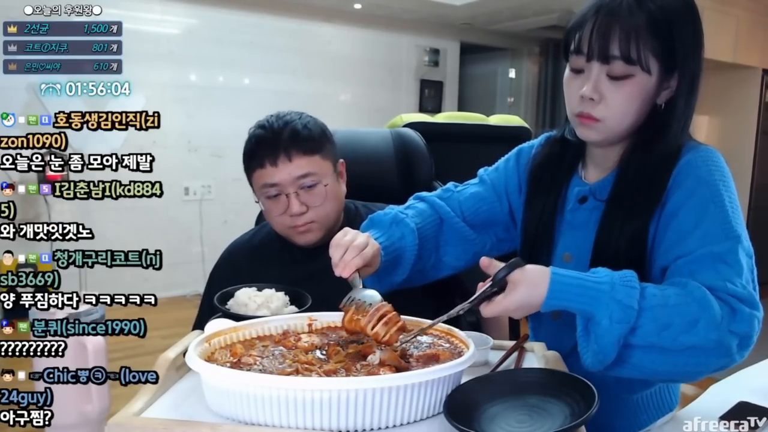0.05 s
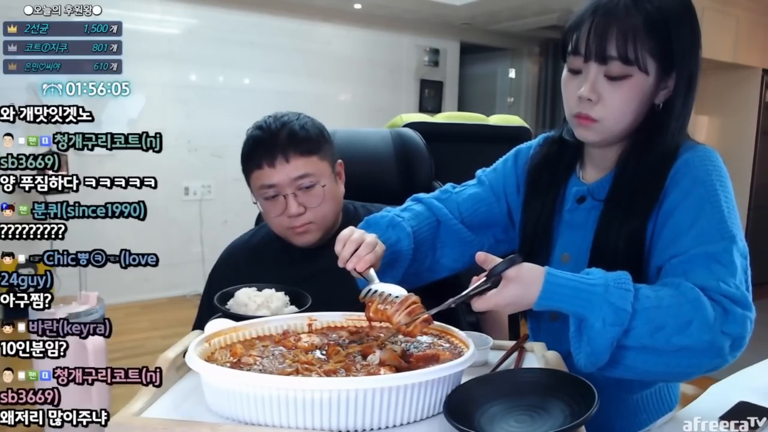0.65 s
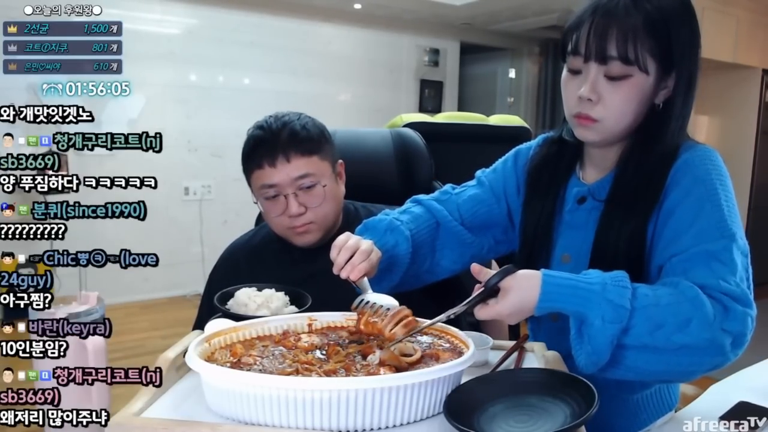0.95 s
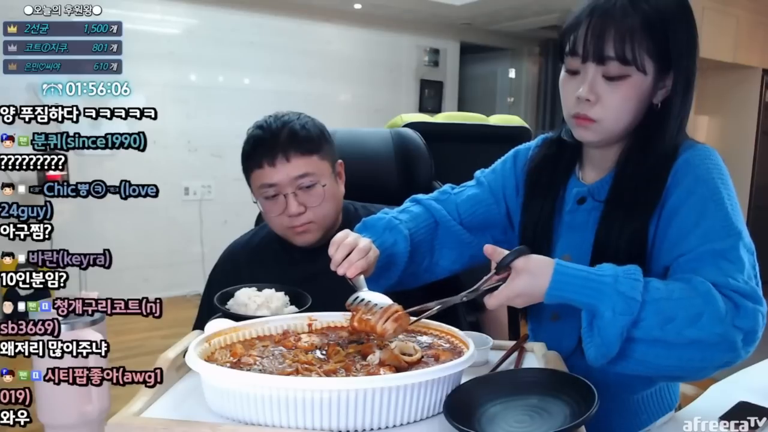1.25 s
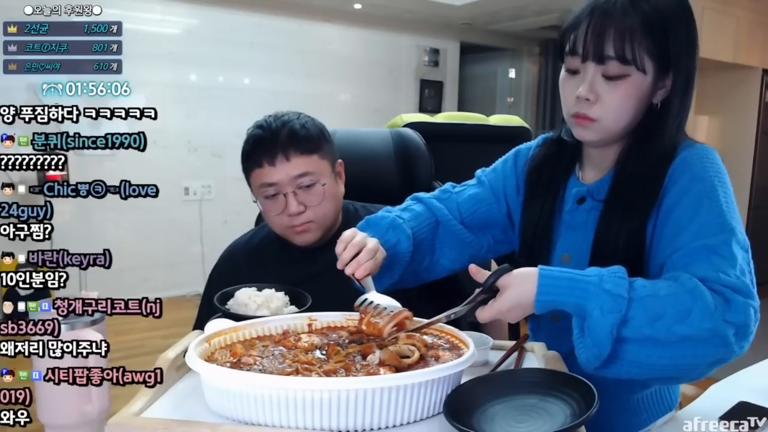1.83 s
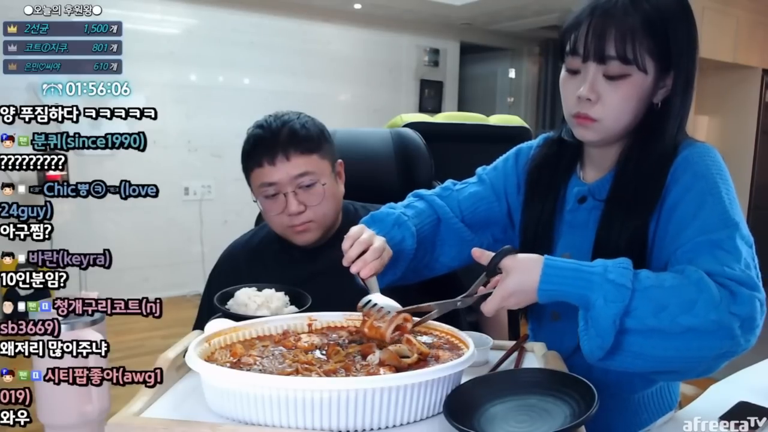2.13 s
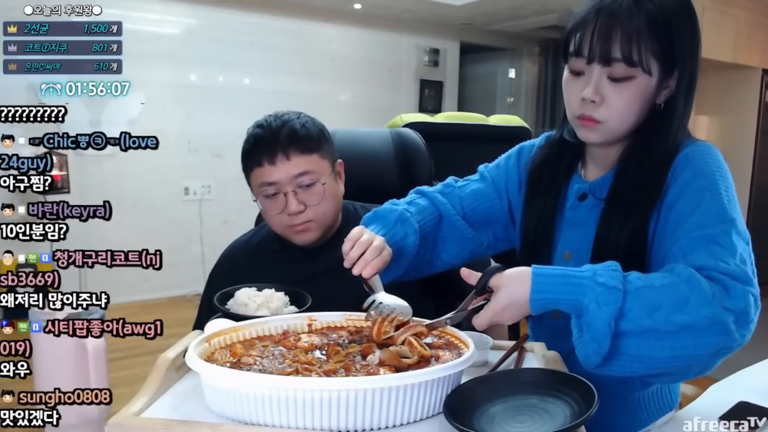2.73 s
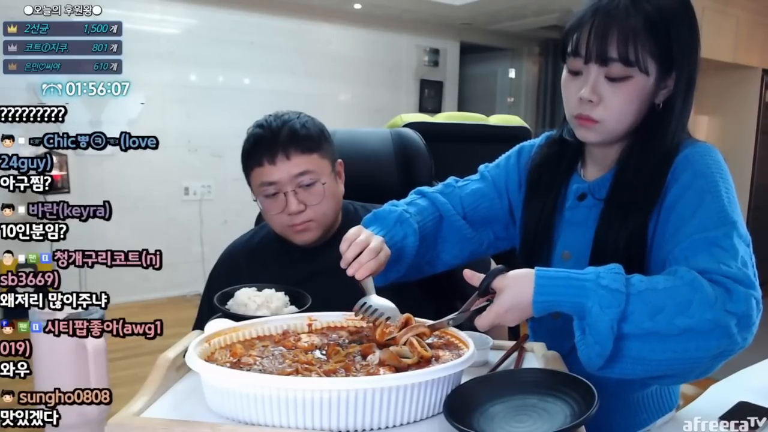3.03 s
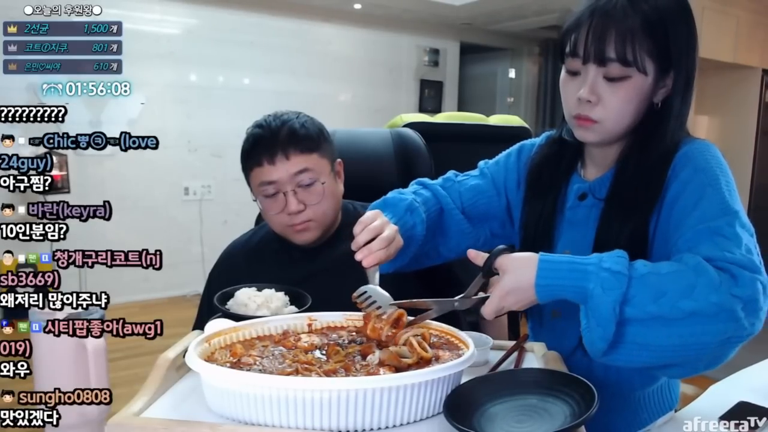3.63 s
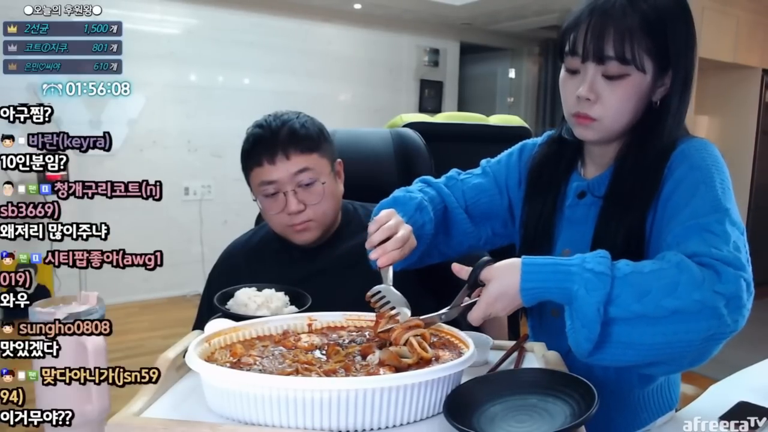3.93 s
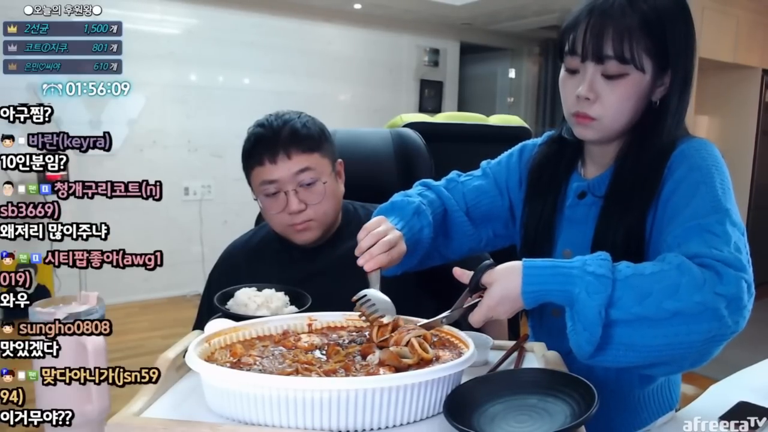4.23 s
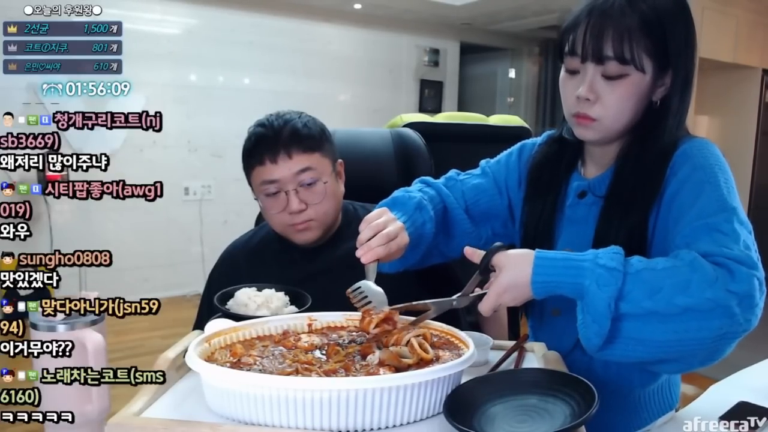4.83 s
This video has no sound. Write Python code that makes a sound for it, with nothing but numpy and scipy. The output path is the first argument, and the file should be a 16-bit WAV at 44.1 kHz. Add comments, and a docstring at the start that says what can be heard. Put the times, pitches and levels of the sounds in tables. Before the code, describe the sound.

Close, crisp snips of scissors cutting saucy food, with small metallic clinks and squeaks, in a quietly humming room.

```python
"""Kitchen scissors cut food held with a fork over a serving dish, close by in a small room that hums.
First come three snips: the steel blades hiss along each other, snap shut and slide open again.
Next the blades jerk under pressure with a clink and a short squeak, then rub lightly.
A fourth snip, a second jerk and two more snips follow; the last snaps loudest, and the blades reopen.
All along, sauce and cutlery tick faintly."""
import sys
import numpy as np
from scipy import signal
from scipy.fft import rfft, irfft, next_fast_len
from scipy.io import wavfile
from scipy.ndimage import map_coordinates

SR = 44100
rng = np.random.default_rng(int(sys.argv[2]) if len(sys.argv) > 2 else 0)


def wav_out(sig):
    """Save sig, one row per channel (or a flat mono array), as 16-bit PCM at SR to the path in sys.argv[1]."""
    wavfile.write(sys.argv[1], SR, np.round(np.clip(np.atleast_2d(sig).T, -1, 1) * 32767).astype(np.int16))


N = 223887

# Each closing of the scissors:
# shut_s, squeeze_s, bite_db, sweep_db, crack_db, clack_db, knock_db, bright_hz, stereo_width (0-1)
SNIPS = [(0.0196, .08, -43, -36.5, -31, -36, -51.5, 12000, 0.07),
         (1.0045, 0.084, -43, -31, -21.5, -29, -46, 11600, 0.66),
         (1.890, .058, -42, -31.5, -45, -54, -61, 13000, 0.05),
         (3.3592, 0.046, -42, -38, -20.5, -35.5, -29, 12400, 0.01),
         (4.2484, 0.039, -52, -44, -42, -47.5, -33, 8700, 0.03),
         (4.6555, 0.085, -40, -32, -15.5, -40, -24, 11000, 0.9)]
# Tone colour of the sharp crack: pitch_hz, level_db
CRACK_COLOUR = [(200, -32), (700, -21.5), (1500, -11.5), (2100, -19), (3000, -14.5), (4000, -10),
                (4900, -8), (6500, -0.5), (7500, -1.5), (8700, 5), (10500, -7), (12500, -5.5),
                (15500, -15.5)]
# Tone colour of the pivot's hollow clack: pitch_hz, level_db
CLACK_COLOUR = [(1500, -19.5), (2800, -10.5), (3350, -1.5), (3750, 1.5), (4200, -3), (4800, -10),
                (6200, -7.5), (8000, -32.5)]
# Notes of the handles as they meet: pitch_hz, level_db, fade_s (time to fall 60 dB)
HANDLE_NOTES = [(486.5, -13, 0.039), (843, -6, 0.049), (952, -2, 0.029), (1045, -6, 0.018),
                (1314, -3.5, 0.021), (1665, -10.5, 0.0234)]

def snaps():
    """The blades rush through the last of the food: a crack, a pivot clack and a knock of the handles."""
    out, lead_s = np.zeros((2, N)), 0.015
    t = np.arange(SR // 5) / SR - lead_s  # zero when the blades shut
    after = np.maximum(t, 0)
    rush = gain(-19.5 + 20 * np.minimum(t, 0) / 0.015)
    release = fade(after, 0.004) + gain(-9) * fade(after, 0.035)
    force = np.where(t < 0, rush, release)
    onset = 1 - np.exp(-after / 0.00046)
    for shut_s, *_, crack_db, clack_db, knock_db, bright_hz, width in SNIPS:
        crack = hit(coloured(force * slips(len(t), rough=0.17), CRACK_COLOUR), crack_db)
        clack = hit(coloured(force * slips(len(t), rough=0.44), CLACK_COLOUR), clack_db)
        knock = hit(onset * ring(HANDLE_NOTES, after, scatter_db=2), knock_db)
        # some snaps sound duller, others brighter
        snap = muffled(crack + clack + knock, bright_hz, steepness=10)
        snap = widened(snap, width)
        add(out, shut_s - lead_s, snap)
        add(out, shut_s - lead_s + 0.009, gain(-21.5) * snap)  # bounce off a near surface
    return out

# The blades slide open again: peak_s, level_db
OPENINGS = [(0.182, -38), (1.188, -38), (2.046, -39), (3.541, -36), (4.826, -37.5)]
# Loose blades rub lightly between cuts: peak_s, level_db, rise_s, fall_s (both over the top 20 dB)
LIGHT_RUBS = [(2.765, -59.5, 0.2, 0.2), (2.912, -57.5, 0.05, 0.18)]

def rubbing_effort():
    """How hard the edges rub: each snip bites, squeezes and sweeps shut; opening blades rub too."""
    t = np.arange(N) / SR
    def stroke(peak_s, level_db, rise_s, fall_s):
        drop = np.where(t < peak_s, ((peak_s - t) / rise_s) ** 2, (t - peak_s) / fall_s)
        return gain(level_db - 20 * drop)
    strokes = [stroke(*rub) for rub in LIGHT_RUBS]
    strokes += [stroke(*opening, rise_s=0.016, fall_s=0.049) for opening in OPENINGS]
    for shut_s, squeeze_s, bite_db, sweep_db, *_ in SNIPS:
        bite_s = shut_s - squeeze_s
        bite = stroke(bite_s, bite_db, rise_s=0.034, fall_s=0.031)
        squeeze = gain(bite_db - 9) * ((t > bite_s) & (t < shut_s))
        sweep = stroke(shut_s, sweep_db, rise_s=0.016, fall_s=0.015)
        strokes += [bite, squeeze, sweep]
    return np.linalg.norm(strokes, axis=0)

# Tone colour of edge sliding on edge: pitch_hz, level_db
HISS_COLOUR = [(500, -28.5), (1800, -17.5), (3200, -17), (4400, -9.5), (5000, -15), (6500, -9),
               (8000, -1.5), (9000, 1), (10300, -1), (11600, -11), (12500, -8), (14400, -12), (15300, -8.5)]
# Notes of the bare steel blades: pitch_hz, level_db, fade_s
STEEL_NOTES = [(1380, -19.5, 0.031), (2377, -9, 0.027), (3760, -15.5, 0.053), (4010, -17, 0.069),
               (4430, -14.5, 0.058), (5620, -9, 0.036), (6570, -4.5, 0.066), (6800, -4.5, 0.069),
               (7340, -7.5, 0.057), (7900, -19, 0.029), (8140, -6, 0.025), (8320, -3.5, 0.063),
               (9014, 0.5, 0.057), (9960, -7, 0.061), (12900, -11, .04), (12700, -20, .04),
               (13800, -7, 0.043)]

def blade_hiss():
    """The edges rub through wet food: a gritty hiss that swells and fades with each stroke."""
    effort = rubbing_effort()
    catches = gain(2.5 * wobble(200))  # the edges catch and let go
    rub = effort * unit_level(catches * slips(N, rough=0.31))
    steel = ring(STEEL_NOTES, np.arange(SR // 8) / SR, scatter_db=-6.5)
    blades = gain(-3) * coloured(rub, HISS_COLOUR) + gain(-14.5) * resonate(rub, steel)
    grit = gain(-6.5) * crackle(per_s=1300, centre_hz=9810, spread=0.37, life_s=0.00047)
    squelch = gain(-23) * crackle(per_s=600, centre_hz=2949, spread=0.483, life_s=0.00087)
    return blades + effort * (grit + squelch)

def crackle(per_s, centre_hz, spread, life_s, size=256):
    """Wet fibres part: tiny pings of random pitch and strength."""
    when, pitch, strength = rng.uniform(0.001, 0.999, (int(per_s * N / SR), 3)).T
    hz = np.clip(centre_hz * np.exp(spread * (2 * pitch - 1)), 500, SR / 2.2)[:, None]
    t = np.arange(size) / SR
    swell = t / life_s * np.exp(-t / life_s)
    pings = -np.log(strength)[:, None] * swell * np.sin(2 * np.pi * hz * t)
    places = (when * N).astype(int)[:, None] + np.arange(size)
    return unit_level(np.bincount(places.ravel(), pings.ravel(), N)[:N])

# Blades jerk under pressure; high and low are two squeaks, their levels relative to the drag:
# start_s, clink_db, drag_start_db, drag_end_db, length_s, high_hz, high_db, low_hz, low_db, stereo_width
JERKS = [(2.3915, -25, -30, -41, 0.0456, 9200, -6, 6340, -8.5, 0),
         (3.8985, -20.5, -34.5, -21, 0.035, 8110, 0.5, 7030, -7.5, 0.9)]
# Tone colour of steel breaking loose: pitch_hz, level_db
CLINK_COLOUR = [(500, -49), (1000, -26), (1400, -8.5), (1900, -26.5), (2500, -19.5), (3900, -6.5),
                (5000, -17), (6500, -0.5), (9000, 2), (10800, -8.5), (12800, -4.5), (14000, -5),
                (15500, -15)]
# Tone colour of steel dragging: pitch_hz, level_db
DRAG_COLOUR = [(400, -35), (1000, -29.5), (1400, -12), (1900, -21), (2500, -16), (4100, -12), (5000, -16),
               (6700, -3), (8500, 3), (10100, -2), (11200, -10), (13300, -4), (15500, -18)]

def jerks():
    """Steel breaks loose with a clink, then drags on; it sticks and slips, squeaking on two notes."""
    out, t = np.zeros((2, N)), np.arange(SR // 5) / SR
    def squeak(hz, db):
        level = gain(db + 2.9 * wobble(455, len(t)))
        pitch_hz = hz * (1 + 0.0108 * wobble(1000, len(t)))
        return level * np.sin(2 * np.pi * np.cumsum(pitch_hz) / SR)
    for start_s, clink_db, *drag_db, length_s, high_hz, high_db, low_hz, low_db, width in JERKS:
        release = fade(np.maximum(t - length_s, 0), 0.0335)
        pressure = gain(np.interp(t, [0, length_s], drag_db)) * release
        clink = hit(coloured(fade(t, 0.029) * slips(len(t), rough=0.21), CLINK_COLOUR), clink_db)
        rub = pressure * slips(len(t), rough=0.37)
        drag = gain(-5.5) * coloured(rub, DRAG_COLOUR)
        steel = ring(STEEL_NOTES, t, scatter_db=-1.5)
        ringing = gain(-8) * resonate(rub + gain(-12) * clink, steel)
        squeaks = pressure * (squeak(high_hz, high_db) + squeak(low_hz, low_db))
        add(out, start_s, clink + widened(drag + ringing + squeaks, width))
    return out

# An edge sings as the blades' crossing point slides to the tips:
# start_s, end_s, start_hz, end_hz, level_db
EDGE_NOTES = [(0.853, 0.988, 7450, 12300, -59), (2.68, 2.812, 9500, 10800, -66),
              (3.237, 3.343, 9600, 10900, -56.5), (4.541, 4.580, 4450, 4630, -52)]

def singing_edge():
    """The free end of the blade shortens, so its fuzzy note rises."""
    out = np.zeros(N)
    for start_s, end_s, start_hz, end_hz, level_db in EDGE_NOTES:
        size = round((end_s - start_s) * SR)
        phase = 2 * np.pi * np.cumsum(np.linspace(start_hz, end_hz, size)) / SR
        note = wobble(1283, size) * np.cos(phase) + wobble(1294, size) * np.sin(phase)
        add(out, start_s, gain(level_db) * np.sqrt(np.hanning(size)) * unit_level(note))
    return out

# Small touches of steel and wet food: start_s, level_db, pitch_hz
TOUCHES = [(0.1193, -34.5, 9300), (0.93, -26, 12300), (1.207, -24, 9600), (1.855, -24.5, 8850),
           (2.0273, -37, 8500), (2.821, -42, 3000), (2.902, -42, 9500), (3.046, -34.5, 11750),
           (3.217, -41.5, 1130), (3.305, -29, 9100), (3.503, -41.5, 1090), (3.577, -25, 12100),
           (4.281, -38.5, 8600), (4.551, -35.5, 4630), (4.567, -23, 9000), (4.610, -39, 1000)]

def ticks():
    """Steel, food and sauce make tiny bursts of noise; the low, wet ones last longer."""
    out, t = np.zeros(N), np.arange(SR // 10) / SR
    sauce_per_s, low_hz, high_hz = 4.4, 890, 9900
    sauce = [(when * N / SR, -54.5 + 4 * strength, low_hz * (high_hz / low_hz) ** pitch)
             for when, strength, pitch in rng.random((int(sauce_per_s * N / SR), 3))]
    for start_s, level_db, hz in TOUCHES + sauce:
        fade_s = 0.012 * (9000 / hz) ** 0.41
        colour = [(hz / 4, -28), (hz * 0.81, -8), (hz, 0), (hz * 1.29, -9), (hz * 4, -29), (hz * 12, -42)]
        tick = coloured(fade(t, fade_s) * rng.standard_normal(len(t)), colour)
        add(out, start_s, gain(level_db - 1) * tick / np.abs(tick).max())
    return out

# Tone colour of the walls' echo: pitch_hz, level_db
ECHO_COLOUR = [(200, 11.5), (1000, 0), (2500, 4.5), (3900, 0), (5300, 2.5), (7500, -2.5), (11000, -5.5),
               (15000, -10)]
# How long the echo lasts: pitch_hz, fade_s
ECHO_FADES = [(200, 0.4), (1000, 0.34), (3000, 0.28), (7500, 0.34), (11000, 0.26), (15000, 0.158)]

def room_echo(x):
    """The walls answer after a few milliseconds; the highest pitches die first."""
    hz, t, noise = signal.stft(rng.standard_normal(SR // 2), SR, nperseg=256)
    levels = gain(value_at(ECHO_COLOUR, hz))[:, None] * fade(t, value_at(ECHO_FADES, hz)[:, None])
    tail = signal.istft(noise * levels, SR, nperseg=256)[1]
    tail = np.pad(tail / np.linalg.norm(tail), (round(0.006 * SR), 0))
    return signal.fftconvolve(x, tail[None], axes=1)[:, :N]

# Mains hum, a fan, then thin whines: pitch_hz, level_db
HUM_NOTES = [(61.8, -53.5), (166.5, -58), (497, -71), (2552, -80), (3359, -83.5), (5846, -82.5),
             (8000, -80)]
# Tone colour of the air's low rumble: pitch_hz, level_db
AIR_RUMBLE = [(20, -45), (45, -32.5), (75, -14.5), (110, -18), (132, -7), (185, -12.5), (240, -17),
              (295, -16.5), (333, -31.5), (380, -20.5), (560, -22), (620, -34.5), (800, -100)]
# Tone colour of the air's thin hiss: pitch_hz, level_db
AIR_HISS = [(595, -37), (650, -1.5), (720, 1), (1000, -0.5), (1170, -9), (1380, 0.5), (1850, -13),
            (2400, -12.5), (5000, -19), (8000, -12), (11500, -20.5), (15500, -23)]

def appliances():
    """Appliances hum and move air; a thin hiss lies on top."""
    t = np.arange(N) / SR
    def air(colour):
        return unit_level(filtered(rng.standard_normal(N), lambda hz: gain(value_at(colour, hz))))
    def tone(hz, db, drift, flutter_db):
        level = np.sqrt(2) * gain(db + flutter_db * wobble(9))
        return level * np.sin(2 * np.pi * hz * t + drift * wobble(9))
    mains, fan, *whines = HUM_NOTES
    hum = tone(*mains, drift=0.37, flutter_db=1.3) + tone(*fan, drift=1.03, flutter_db=1)
    whine = sum(tone(*note, drift=0.44, flutter_db=1.5) for note in whines)
    return hum + whine + gain(-52.5) * air(AIR_RUMBLE) + gain(-60) * air(AIR_HISS)

def gain(db):
    """Turn decibels into a multiplier."""
    return 10 ** (np.asarray(db) / 20)

def fade(t, fade_s):
    """Fall by 60 dB every fade_s seconds."""
    return gain(-60 * t / fade_s)

def unit_level(x):
    """Scale x to an average (rms) level of 1."""
    return x / np.sqrt(np.mean(x ** 2) + 1e-20)

def hit(x, level_db):
    """Give x the energy of a 5 ms sound at this level."""
    return gain(level_db) * x / np.linalg.norm(x) * np.sqrt(0.005 * SR)

def value_at(points, hz):
    """Read between the rows of a (pitch_hz, value) table, on an octave scale."""
    pitches, values = np.transpose(points)
    return np.interp(np.log(hz + 1), np.log(pitches + 1), values)

def wobble(per_s, size=N):
    """A smooth curve through per_s random values a second."""
    points = rng.standard_normal(int(size * per_s / SR) + 4)
    return map_coordinates(points, [np.arange(size) * per_s / SR])

def slips(size, rough):
    """Rubbing noise: many tiny slips of uneven size."""
    return unit_level(rng.standard_normal(size) * np.exp(rough * wobble(1800, size)))

def ring(notes, t, scatter_db):
    """Fading notes, struck with new strengths and signs each time."""
    return sum(rng.choice([-1, 1]) * gain(db + scatter_db * rng.normal())
               * fade(t, fade_s) * np.sin(2 * np.pi * hz * t) for hz, db, fade_s in notes)

def resonate(x, ringing):
    """Let every sample of x set off this ringing."""
    return signal.fftconvolve(x, ringing / np.linalg.norm(ringing))[:len(x)]

def coloured(x, colour, size=1024):
    """Give x a tone colour: some pitches stronger, others weaker."""
    cepstrum = irfft(np.log(gain(value_at(colour, np.fft.rfftfreq(size, 1 / SR)))))
    cepstrum[1:size // 2] *= 2  # folded so the filter rings only after a sound
    cepstrum[size // 2 + 1:] = 0
    return resonate(x, irfft(np.exp(rfft(cepstrum))))

def filtered(x, response):
    """Multiply each pitch in x by response(hz)."""
    size = x.shape[-1]
    padded = next_fast_len(size + SR // 4)
    return irfft(rfft(x, padded) * response(np.fft.rfftfreq(padded, 1 / SR)), padded)[..., :size]

def muffled(x, top_hz, steepness):
    """Turn down the pitches above top_hz."""
    return filtered(x, lambda hz: 1 / np.sqrt(1 + (hz / top_hz) ** steepness))

def widened(x, width):
    """Make two channels whose highest pitches are out of step."""
    turn = lambda hz: width * np.pi / 2 * np.interp(hz, [8500, 10500], [0, 1])
    return filtered(x, lambda hz: np.exp(1j * np.array([turn(hz), -turn(hz)])))

def add(track, start_s, x):
    """Mix x into the track at start_s."""
    part = track[..., max(round(start_s * SR), 0):][..., :x.shape[-1]]
    part += x[..., :part.shape[-1]]

def scene():
    """Scissors close by, with the room's echo and hum behind them."""
    scissors = snaps() + jerks() + blade_hiss() + singing_edge() + ticks()
    return scissors + gain(-17) * room_echo(scissors) + appliances()

def record(dry):
    """The microphone cuts off the very highest pitches."""
    return muffled(dry, top_hz=15800, steepness=160)

dry = scene()
out = record(dry)
wav_out(out)
```